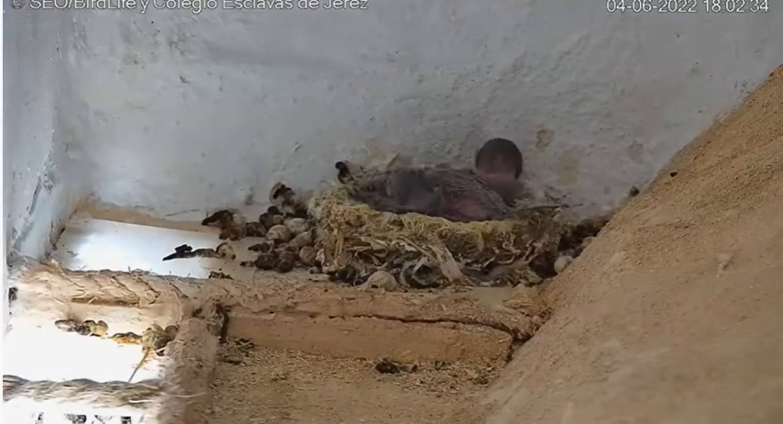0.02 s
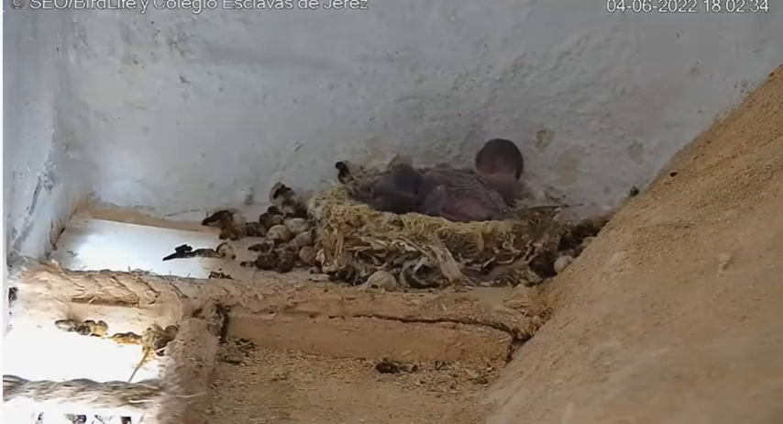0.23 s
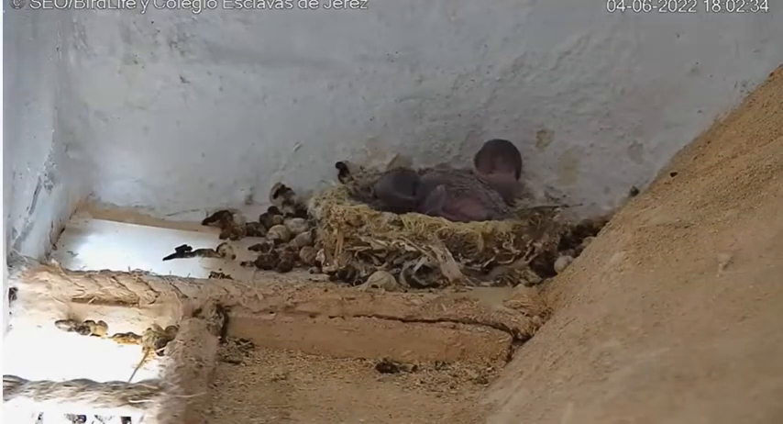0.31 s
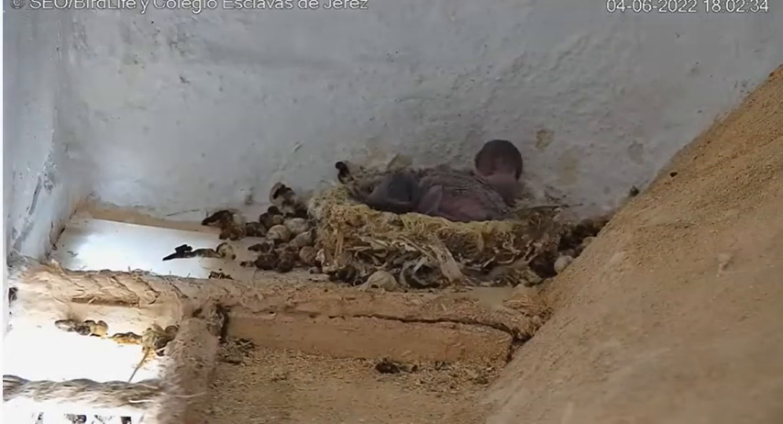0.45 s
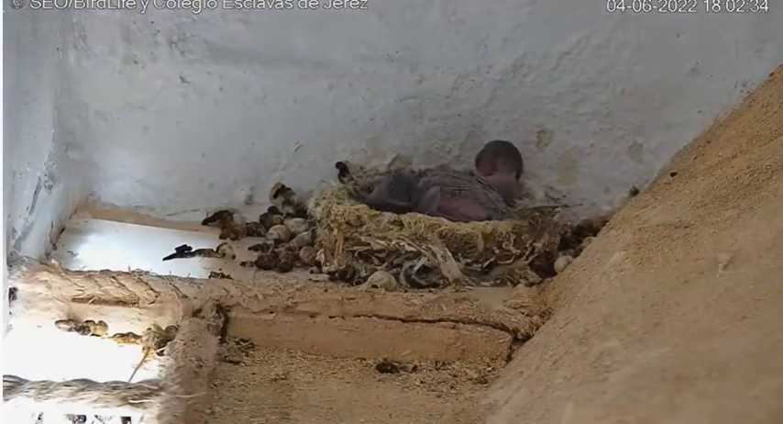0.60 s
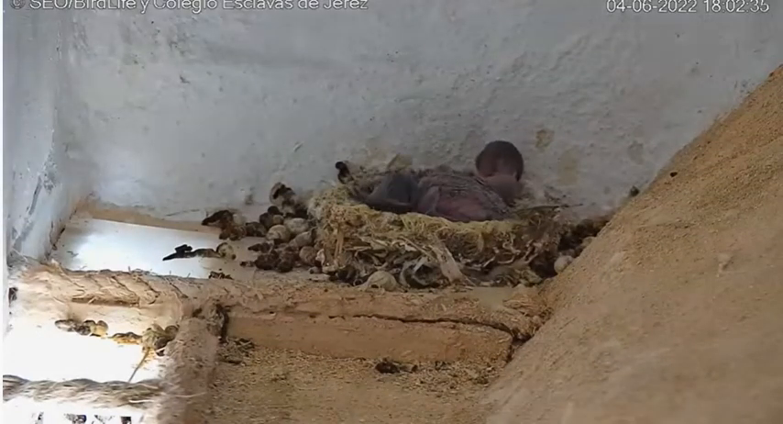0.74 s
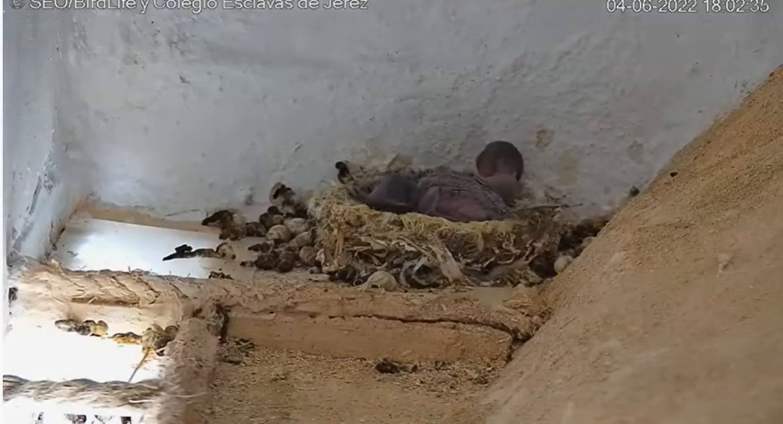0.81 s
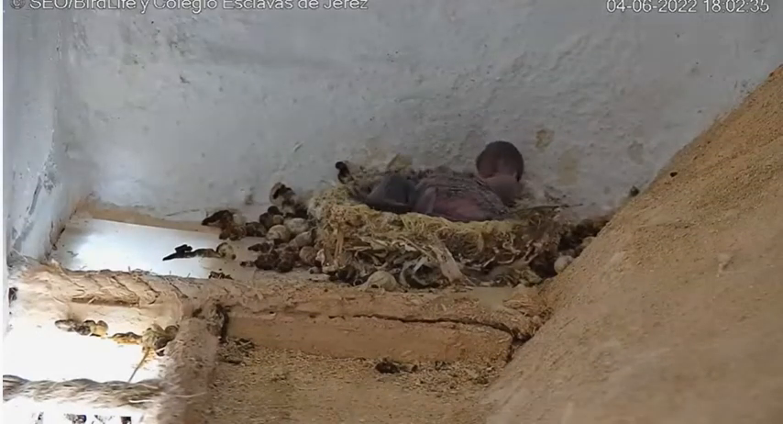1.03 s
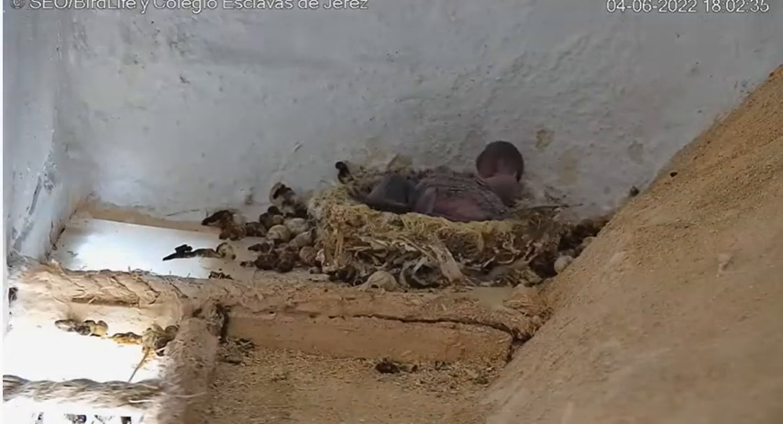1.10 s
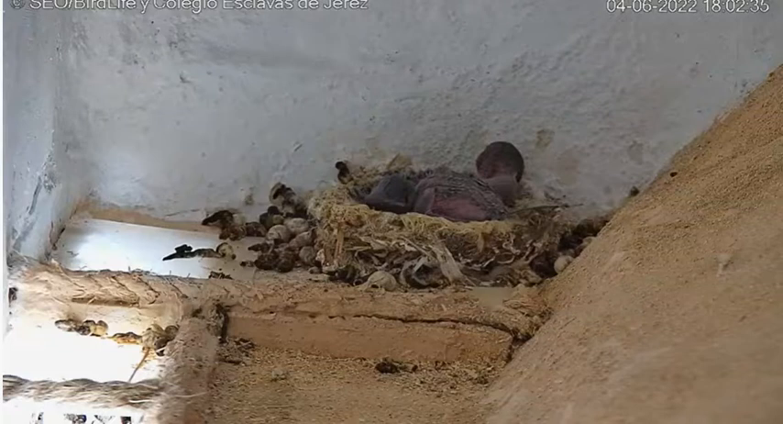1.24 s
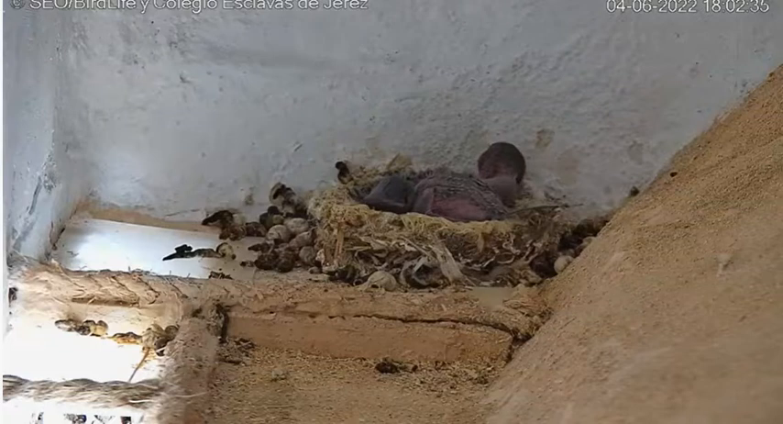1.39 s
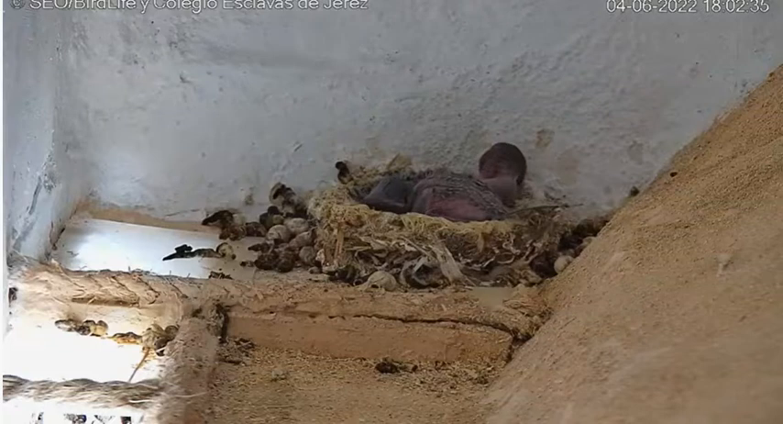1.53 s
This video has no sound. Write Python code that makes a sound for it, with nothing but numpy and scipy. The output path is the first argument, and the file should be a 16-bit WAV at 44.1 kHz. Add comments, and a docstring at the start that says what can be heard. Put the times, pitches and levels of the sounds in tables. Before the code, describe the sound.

Two shrill, rasping bird screams ring out close by, the second one louder.

```python
"""A faint bird whistle and a brief rustle open the scene, at a nest under the eaves.
Then a swift screams close by, at 0.1 s and again at 0.9 s: each scream slides up as a whistle, breaks
into a harsh rasp with a second voice of the syrinx above it, and drops away. Close walls and the yard
outside answer. On the loud parts the small nest camera overloads, folds the overtones down into a
low gurgle and turns its gain down."""
import sys
import numpy as np
from scipy import signal
from scipy.fft import rfft, irfft
from scipy.io import wavfile
from scipy.ndimage import map_coordinates

SR = 44100
rng = np.random.default_rng(int(sys.argv[2]) if len(sys.argv) > 2 else 0)


def generate_wav(sig):
    """Save sig (samples, or channels by samples) to the path in sys.argv[1] as 16-bit PCM at SR."""
    pcm = np.round(np.clip(np.atleast_2d(sig).T, -1, 1) * 32767).astype(np.int16)
    wavfile.write(sys.argv[1], SR, pcm)


N = 68355

# Tone colour of the hiss, the send to the yard, the rustle and the rasp (frequency [Hz], gain [dB])
HISS_EQ = [(25, 2), (90, -0.5), (160, 9.5), (250, 15), (450, 3), (1100, 3.5), (2000, -7), (7000, -9),
           (14000, -11), (16000, -16)]
YARD_EQ = [(1000, 14), (3500, 0), (4400, -1.5), (5050, -5.5), (5500, 8), (5900, -2.5), (7000, -3),
           (8000, -10.5)]
RUSTLE_EQ = [(100, -13.5), (800, 2), (2000, -6), (4500, -7.5), (6500, 2), (7600, 5), (9000, -45)]
RASP_EQ = [(200, -26.5), (1500, -17.5), (2200, -3.5), (3000, -5.5), (4200, 0.5), (5200, -8.5), (6300, 1.5),
           (7300, 1), (8000, -20), (10000, -24.5)]
# Early reflections off the close walls (delay [s], gain [ratio])
WALL_TAPS = [(.0021, .2), (.0047, 0.9), (.0083, 0.57), (0.0128, 0.55)]
# Partials of the opening whistle (harmonic [number], gain [dB])
WHISTLE_HARMONICS = [(2, 4.5), (3, -24.5), (4, -12.5), (6, -32)]
# Swell and fade of the opening whistle (time [s], level [dB])
WHISTLE_ENVELOPE = [(0.0, -54), (0.016, -44.5), (0.09, -104)]
# Upper voice of each scream (time [s], pitch [Hz], level [dB])
FIRST_UPPER = [(.228, 3950, -63), (.236, 4100, -39.5), (.252, 4850, -54.5), (.275, 5300, -50),
               (.36, 5400, -51), (.53, 4700, -59), (.59, 4450, -50.5), (.62, 4100, -57),
               (.645, 3800, -80.5)]
SECOND_UPPER = [(1.025, 5588, -51.5), (1.036, 5600, -31.5), (1.052, 5535, -32), (1.075, 5150, -44.5),
                (1.17, 4800, -39.5), (1.255, 4890, -34), (1.285, 4500, -36), (1.305, 4200, -64)]
# Glide and grit of each scream (time [s], pitch [Hz], roughness [ratio], rasp against tone [dB])
FIRST_GLIDE = [(.105, 2680, 0.16, -44), (.125, 3000, 0.31, -43.5), (.168, 3080, 0.26, -16),
               (.185, 3361, 0.17, -18), (.215, 3705, 0.1, -33), (.233, 4018, 0.22, -21.5),
               (.239, 3542, .12, -31), (.29, 3447, .18, -19), (.34, 3450, 0.66, -9), (.41, 3350, 1, 3),
               (.5, 3400, 1.2, -0.5), (.6, 3673, 0.8, -4.5), (.605, 3684, 0, -14), (.638, 3400, 0.3, -15),
               (.665, 3058, 0.5, -9)]
SECOND_GLIDE = [(.9, 3450, .35, -27.5), (.91, 3728, 0.29, -29), (.92, 4350, .2, -24.5),
                (.94, 4981, 0.23, -27), (.975, 5384, .05, -48), (1.028, 5574, 0.094, -30),
                (1.036, 5300, 0.643, -13), (1.05, 4486, 0.97, -18), (1.15, 4297, 1, -15.5),
                (1.2, 4304, .6, -20.5), (1.252, 4609, 0.561, -19), (1.275, 4225, 1, -15.5),
                (1.3, 3550, .8, -25)]
# Envelopes of each scream before its cue's gains (time [s], fundamental [dB], octave [dB])
FIRST_ENVELOPE = [(0.1, -95.5, -99), (0.108, -54.5, -76), (0.116, -47, -69), (0.138, -51.5, -55),
                  (0.152, -50, -71), (0.178, -50.5, -62.5), (0.188, -36, -56.5), (0.198, -50, -50),
                  (0.212, -28, -43.5), (0.222, -50.5, -38), (0.228, -28.5, -46), (0.234, -24, -33.5),
                  (0.252, -29.5, -21), (0.272, -60.5, -21.5), (0.28, -28, -33), (0.288, -30, -22.5),
                  (0.356, -46, -37.5), (0.538, -48.5, -71), (0.58, -45.5, -47.5), (0.596, -47.5, -54),
                  (0.606, -37.5, -33.5), (0.638, -37, -45.5), (0.656, -54, -55.5), (0.7, -63, -89.5)]
SECOND_ENVELOPE = [(0.895, -93, -110.5), (0.899, -59.5, -70.5), (0.903, -46, -54), (0.917, -39.5, -68),
                   (0.933, -41.5, -66.5), (0.943, -29.5, -65.5), (0.955, -33, -64), (0.969, -28.5, -77.5),
                   (0.981, -25.5, -83), (1.003, -32.5, -82), (1.025, -35.5, -63), (1.031, -37.5, -32),
                   (1.117, -40, -35.5), (1.215, -31, -44.5), (1.229, -32, -42.5), (1.255, -30.5, -55),
                   (1.269, -29.5, -39.5), (1.287, -39, -51.5), (1.335, -78, -88.5)]
# One cue per scream (start [s], end [s], gain [dB], extra octave gain [dB], mid-scream push [dB])
SCREAM_CUES = [(0.104, 0.675, -0.5, -0.5, -1.5), (.902, 1.305, 5.5, 3, 4.5)]
# The camera's input filter and its leaky output filter (frequency [Hz], gain [dB])
INPUT_EQ = [(100, 0), (7250, 0), (7650, -4), (7880, -16), (8000, -50)]
OUTPUT_EQ = [(100, -9.5), (280, -1), (600, -3.5), (1200, -4), (2200, -7), (2800, -3.5), (3400, -2.5),
             (7000, 0), (7600, -6.5), (8000, -8), (8500, -27.5), (9000, -65), (10500, -55.5),
             (12000, -60.5), (14000, -44)]

EDGE_S = 0.003  # fade that keeps an edge from clicking
CAMERA_RATE = 16000  # samples a second
TIME = np.arange(N) / SR


def amp(db):
    """Decibels to gain."""
    return 10 ** (np.asarray(db) / 20)


def curves(rows):
    """Automation lanes: one value per sample for each column after the time."""
    times, *columns = np.transpose(rows)
    return [np.interp(TIME, times, column) for column in columns]


def wobble(rate):
    """A smooth random modulator, rate knots a second."""
    return map_coordinates(rng.standard_normal(N), [TIME * rate], mode="wrap")


def eq_gains(eq, hz):
    """Gain of an EQ curve, drawn on a log frequency axis."""
    points_hz, db = np.transpose(eq)
    return amp(np.interp(np.log(hz + 1), np.log(points_hz + 1), db))


def coloured(x, eq):
    """A sound played through an EQ curve."""
    return irfft(rfft(x) * eq_gains(eq, np.fft.rfftfreq(N, 1 / SR)), N)


def noise(eq):
    """Coloured noise of rms 1."""
    x = coloured(rng.standard_normal(N), eq)
    return x / np.sqrt(np.mean(x ** 2))


def noise_floor(hiss_db=-80.5, hum_db=-88, hum_hz=52):
    """The bed: faint hiss and mains hum in the camera."""
    return amp(hiss_db) * noise(HISS_EQ) + amp(hum_db) * np.sqrt(2) * np.sin(2 * np.pi * hum_hz * TIME)


def reverb(x, t60_s):
    """A space answers with a diffuse tail of energy 1 that blooms quickly and dies away."""
    t = np.arange(SR) / SR
    bloom = 1 - np.exp(-t / (t60_s / 20))
    tail = rng.standard_normal(SR) * amp(-60 * t / t60_s) * bloom
    return signal.fftconvolve(x, tail / np.linalg.norm(tail))[:N]


def wall_reflections(x):
    """Each close wall throws back a slightly delayed copy."""
    return sum(gain * np.pad(x, (int(delay * SR), 0))[:N] for delay, gain in WALL_TAPS)


def rustle(start_s=0.032, hold_s=0.02, level_db=-59.5, fall_db_per_s=699):
    """A brief dry brush of noise that holds, then falls away."""
    age = TIME - start_s
    attack = np.clip(age / EDGE_S, 0, 1)
    return noise(RUSTLE_EQ) * attack * amp(level_db - fall_db_per_s * np.maximum(age - hold_s, 0))


def whistle(fundamental_hz=1289):
    """A faint, fading bird note on a near-steady pitch: overtones of a silent fundamental."""
    level_db, = curves(WHISTLE_ENVELOPE)
    phase = 2 * np.pi * np.cumsum(fundamental_hz * (1 + 0.01 * wobble(230))) / SR
    tone = sum(amp(level_db + db) * np.sin(k * phase) for k, db in WHISTLE_HARMONICS)
    return np.sqrt(2) * tone * (TIME < WHISTLE_ENVELOPE[-1][0])


def gate(start, end):
    """Open from start to end, with a quick fade at each edge."""
    return np.clip(np.minimum(TIME - start, end - TIME) / EDGE_S, 0, 1)


def upper_voice(rows, shake_hz=170):
    """The other side of the syrinx sings a shaky tone above the rasp."""
    pitch, level_db = curves(rows)
    phase = 2 * np.pi * np.cumsum(pitch + shake_hz * wobble(700)) / SR
    return np.sqrt(2) * amp(level_db) * np.sin(phase) * gate(rows[0][0], rows[-1][0])


def scream(glide, envelope, cue, tremor_hz=65.22, jitter_hz=382.3, flutter_db=3):
    """A swift's whistle and its octave; roughness shakes pitch and level, and a rasp takes over."""
    start, end, gain_db, octave_db, push_db = cue
    pitch, roughness, rasp_db = curves(glide)
    low_db, high_db = curves(envelope)
    tremor = tremor_hz * wobble(260)  # even the clean whistle wavers
    jitter = jitter_hz * roughness * wobble(1100)  # chaotic pitch swing
    phase = 2 * np.pi * np.cumsum(pitch + tremor + jitter) / SR
    fundamental, octave = amp(low_db), amp(high_db + octave_db)
    tone = np.sqrt(2) * (fundamental * np.sin(phase) + octave * np.sin(2 * phase))
    rasp = amp(rasp_db) * np.hypot(fundamental, octave) * noise(RASP_EQ)
    voice = (tone + rasp) / np.hypot(1, amp(rasp_db))  # equal-power blend
    arch = np.sin(np.pi * np.clip((TIME - start) / (end - start), 0, 1))
    flutter = flutter_db * roughness * wobble(450)
    return gate(start, end) * voice * amp(gain_db + push_db * arch + flutter)


def scene():
    """The mono mix: two screams with walls, a tight nook and a long yard tail; whistle and rustle dry."""
    screams = scream(FIRST_GLIDE, FIRST_ENVELOPE, SCREAM_CUES[0])
    screams += scream(SECOND_GLIDE, SECOND_ENVELOPE, SCREAM_CUES[1])
    screams += upper_voice(FIRST_UPPER) + upper_voice(SECOND_UPPER)
    nook = amp(-7.5) * reverb(screams, t60_s=0.089)
    yard = amp(-31.5) * reverb(coloured(screams, YARD_EQ), t60_s=0.88)
    return (screams + wall_reflections(screams) + nook + yard + whistle() + rustle())[None]


def overload(x, ceiling_db=-20, knee=1.8):
    """Soft clipping; at the camera's low sample rate the new overtones fold down into a gurgle."""
    return x / (1 + np.abs(x / amp(ceiling_db)) ** knee) ** (1 / knee)


def gain_control(x, threshold_db=-33, cut_db_per_db=0.8, reaction_s=0.063):
    """The camera ducks its gain while the running rms level is over the threshold."""
    memory = np.exp(-1 / (reaction_s * CAMERA_RATE))
    level = np.sqrt(signal.lfilter([1 - memory], [1, -memory], x * x))
    return x * np.maximum(level / amp(threshold_db), 1) ** -cut_db_per_db


def record(dry):
    """The camera chain: input EQ, overload, gain control, low cut, leaky output filter, hiss and hum."""
    low_cut_hz, top_hz = 237, 14500
    size = 2 * SR  # padded to two seconds
    x = np.pad(coloured(dry[0], INPUT_EQ), (0, size - N))
    x = signal.resample(x, 2 * CAMERA_RATE)
    x = gain_control(overload(x))
    x = signal.sosfilt(signal.butter(2, low_cut_hz, "highpass", fs=CAMERA_RATE, output="sos"), x)
    hz = np.fft.rfftfreq(size, 1 / SR)
    # Above half the camera's rate, a mirror image of the sound leaks through the output filter.
    mirrored = np.resize(np.fft.fft(x), len(hz)) * SR / CAMERA_RATE
    spectrum = mirrored * eq_gains(OUTPUT_EQ, hz) + rfft(noise_floor(), size)
    return irfft(spectrum * (hz < top_hz), size)[None, :N]


dry = scene()
out = record(dry)
generate_wav(out)
```